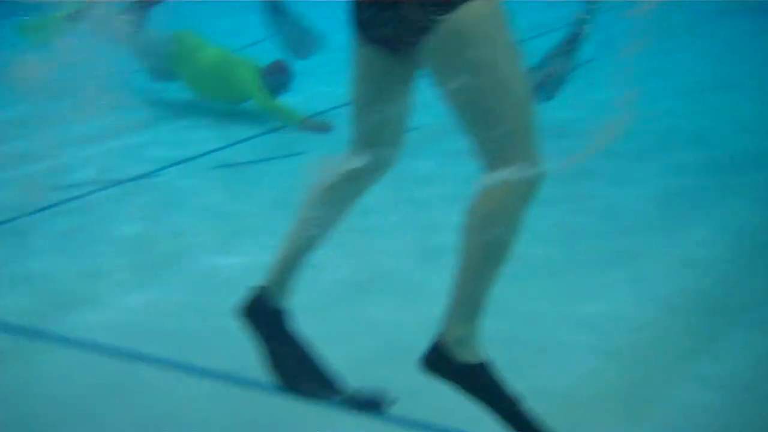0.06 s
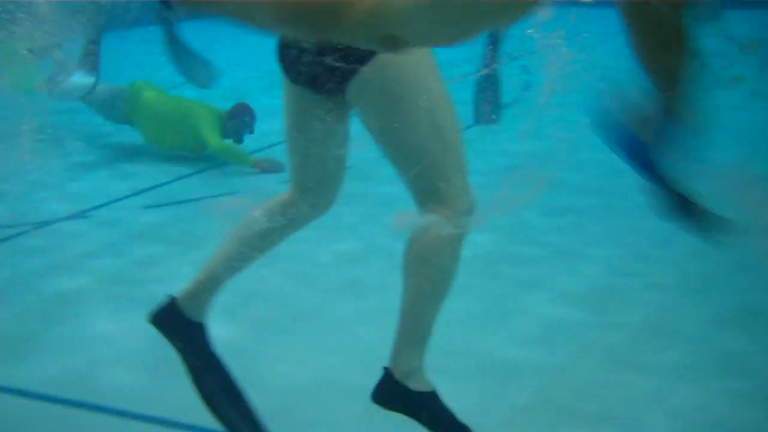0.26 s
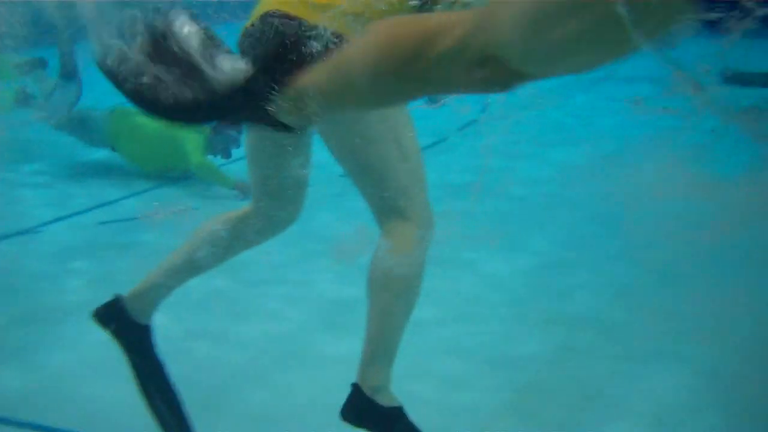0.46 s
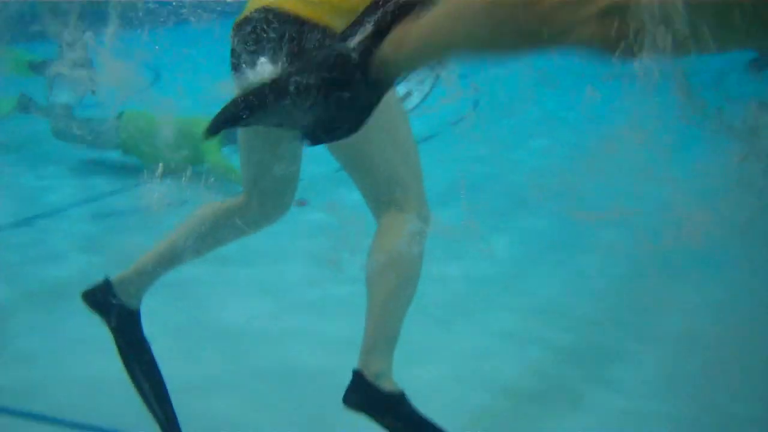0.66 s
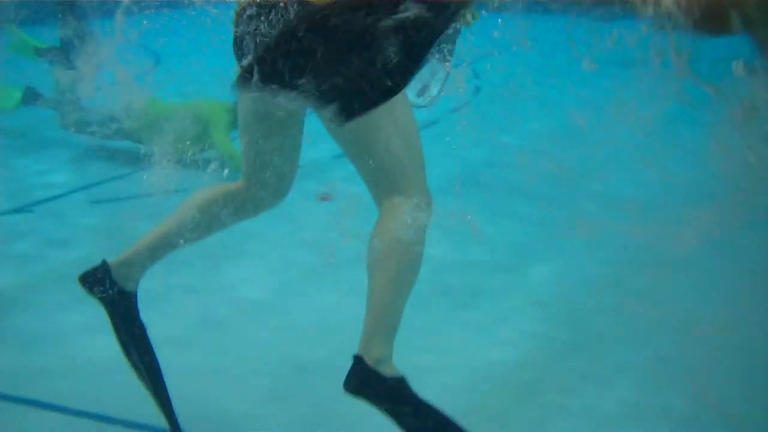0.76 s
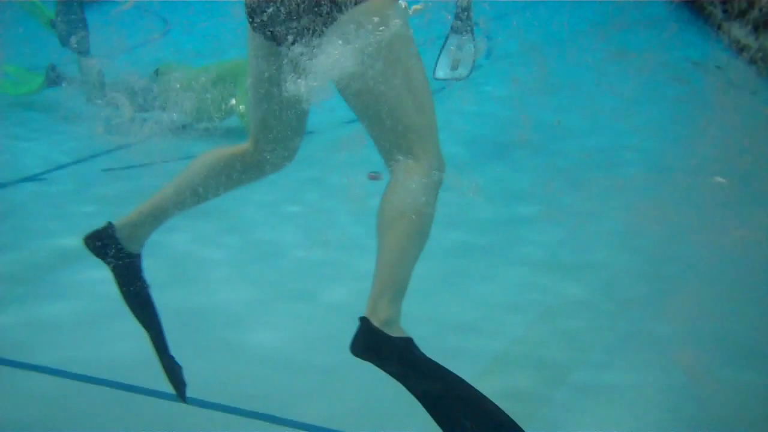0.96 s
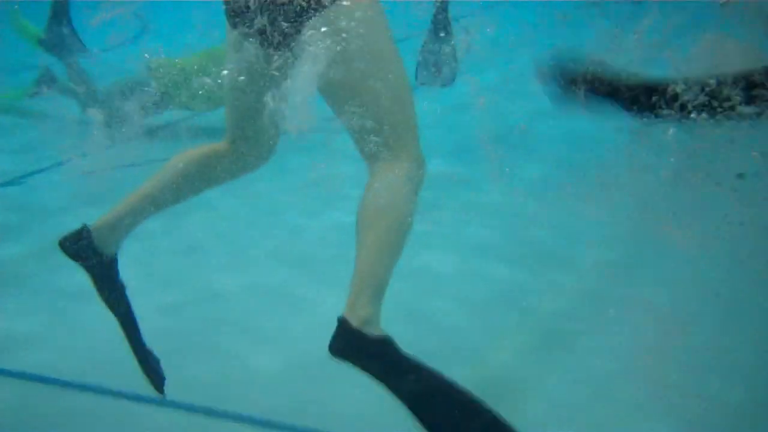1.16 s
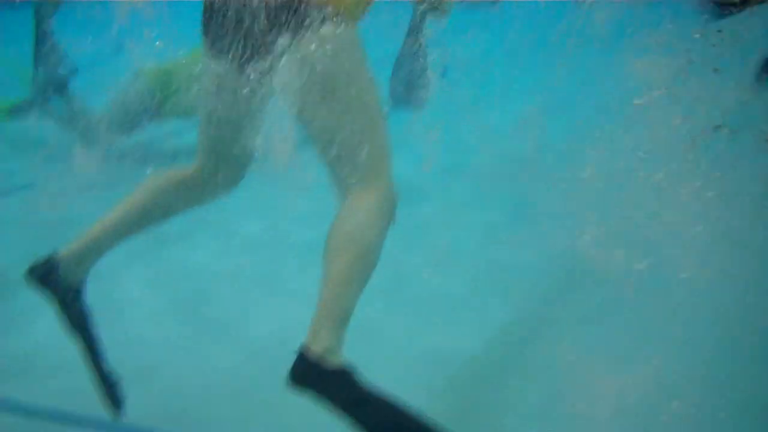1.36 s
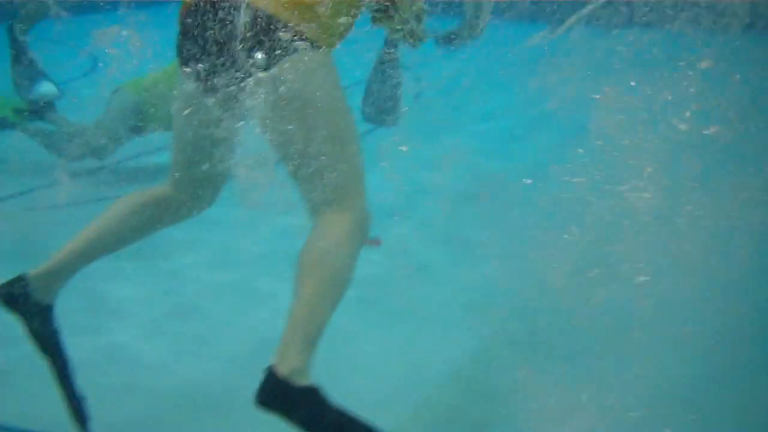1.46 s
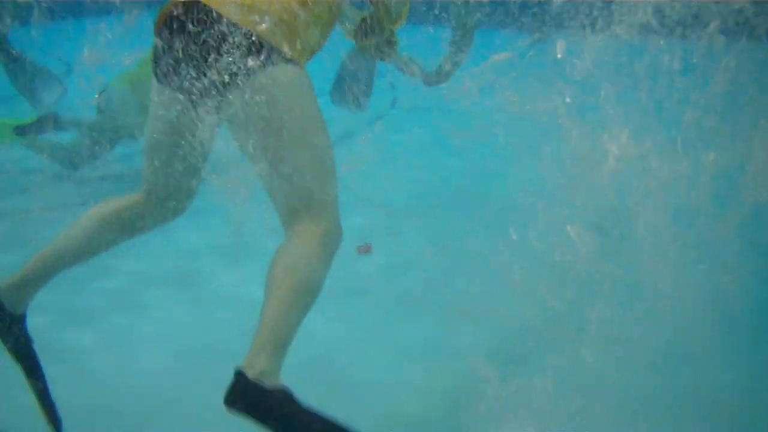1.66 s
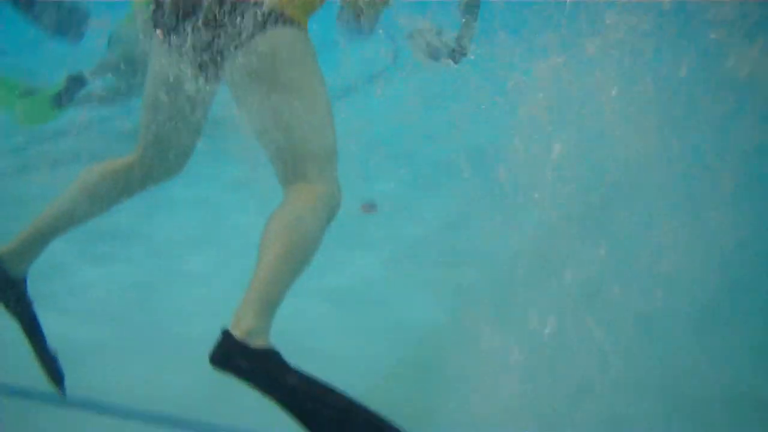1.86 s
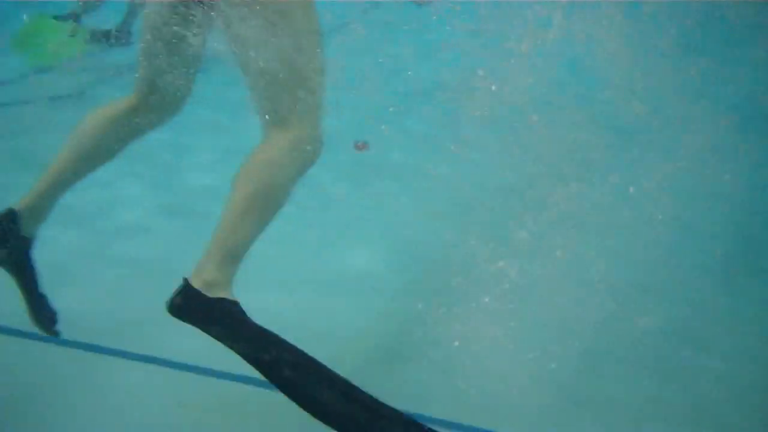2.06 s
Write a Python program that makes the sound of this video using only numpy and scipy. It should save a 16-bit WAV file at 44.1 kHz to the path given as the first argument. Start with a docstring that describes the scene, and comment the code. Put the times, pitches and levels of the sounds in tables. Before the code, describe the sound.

Underwater gurgling in a pool, close and muffled, with crackling bubble fizz and tiny tinkles throughout. At 0.23 seconds a very loud, hollow gulp and thud strike, with more gulps and a booming wake fading until about 0.55. Softer churning follows, with distinct glugs near 1.1, 1.3 and 1.75-1.8. The fizz thins after 1.5, leaving small bright spurts and single bubble pings over low gurgle until 2.1.

```python
"""Air pockets gulp and boom around a watertight housing just under the surface of an indoor pool as swimmers kick past.
Gulps and thuds are swelling, decaying sines near the housing's low resonance; a close kick leaves a muffled
wake of filtered clicks, over steadily gurgling water. Clouds of tiny bubbles fizz as clicks in coloured bands
and resonances of the housing's wall; tinkles are ringing clicks, and a few single bubbles ping as decaying sines."""
import sys
import numpy as np
from scipy import signal
from scipy.io import wavfile

SR = 44100
rng = np.random.default_rng(int(sys.argv[2]) if len(sys.argv) > 2 else 0)


def store_pcm(level_fs):
    """Save levels as 16-bit WAV."""
    pcm = np.round(np.clip(level_fs, -1, 1) * 32767).astype(np.int16)
    wavfile.write(sys.argv[1], SR, np.atleast_2d(pcm).T)


N = 92610
T = np.arange(N) / SR

# Level of the cloud's fine bubbles. Each row: time in seconds, level in dB.
FINE_LEVEL = [(0, -40), (.06, -43.5), (.12, -38.5), (.18, -38.5), (.24, -38), (.29, -44), (.35, -45),
              (.44, -40.5), (.58, -39.5), (.70, -40), (.93, -38), (1.05, -40.5), (1.2, -38), (1.35, -42),
              (1.47, -43.5), (1.55, -44), (1.68, -47.5), (1.85, -46), (1.98, -45), (2.1, -46.5)]
# Place of the cloud by pitch. Each row: frequency in Hz, left-right difference in dB.
CLOUD_PAN = [(500, 1), (1200, -6.5), (1700, -15), (2400, 6.5), (3300, 2), (5000, 2), (7000, -4),
             (9500, 11.5), (14000, -3)]
POPS_PER_S, POP_SPREAD_DB, FIZZ_FLICKER_DB = 1100, 3.5, 2
GURGLES_PER_S, GURGLE_SPREAD_DB, GURGLE_FLICKER_DB = 320, 2.5, 0.5


def from_db(db):
    """Decibels to gain."""
    return 10 ** (np.asarray(db) / 20)


def rms_one(x):
    """Scale to unit power."""
    return x / np.sqrt(np.mean(x ** 2) + 1e-20)


def in_time(rows):
    """A curve at every sample."""
    return np.interp(T, *np.transpose(rows))


def at_hz(points, hz):
    """A spectrum read on a log-frequency axis."""
    point_hz, values = np.transpose(points)
    return np.interp(np.log(hz), np.log(point_hz), values)


def panned(left_right_db):
    """Left and right gains of constant power."""
    return rms_one(from_db([[left_right_db / 2], [-left_right_db / 2]]))


def drift(rate_hz):
    """Slow low-passed noise of unit power, computed at every 40th sample."""
    step = 40
    pole = np.exp(-2 * np.pi * rate_hz * step / SR)
    noise = rng.standard_normal(N // step + 2002)
    slow = signal.lfilter([1], [1, -2 * pole, pole ** 2], noise)[2000:]  # drop the settling
    return np.interp(np.arange(N) / step, np.arange(len(slow)), rms_one(slow))


def pops(rate_per_s, spread_db):
    """Two unrelated trains of bubble clicks of uneven size over the smooth hiss of far ones."""
    far_hiss_db = -1  # relative to the near clicks
    sizes_db = spread_db * np.minimum(rng.exponential(1, (2, N)), 5)
    clicks = from_db(sizes_db) * rng.choice([-1, 1], (2, N))
    near = rms_one(clicks * (rng.random((2, N)) < rate_per_s / SR))
    far = from_db(far_hiss_db) * rng.standard_normal((2, N))
    return rms_one(near + far)


def stereo(pair, hz):
    """Mix two unrelated signals to left and right: alike in the bass, apart in the treble."""
    # Each row: frequency in Hz, left-right correlation.
    likeness = [(100, .98), (250, 0.96), (600, 0.81), (1300, 0.84), (2500, 0.26), (5000, 0.38),
                (8000, -0.14), (14000, -0.29)]
    alike = np.clip(at_hz(likeness, hz), -1, 1)
    return np.sqrt(1 + alike) * pair[0] + np.sqrt(1 - alike) * pair[1] * [[1], [-1]]


def bands(colour, rate_per_s, spread_db, flicker_db):
    """Bubble clicks in third-octave bands, each flickering; yields (Hz, stereo band)."""
    trains = [pops(rate_per_s, spread_db), pops(rate_per_s, spread_db)]
    together = drift(7.9)
    for k, hz in enumerate(31.25 * 2 ** (np.arange(28) / 3)):
        if not colour[0][0] * 0.9 < hz < colour[-1][0] * 1.25:
            continue
        flicker = from_db(flicker_db * (drift(47) + together) / np.sqrt(2))
        sos = signal.butter(2, [hz / 1.12, hz * 1.12], "band", fs=SR, output="sos")
        band = signal.sosfilt(sos, trains[k % 2])  # neighbours use different trains
        yield hz, from_db(at_hz(colour, hz)) * flicker * stereo(band, hz)


def bubbling(colour, rate_per_s, spread_db, flicker_db):
    """All bands of bubble clicks summed to unit power."""
    return rms_one(sum(x for hz, x in bands(colour, rate_per_s, spread_db, flicker_db)))


def resonate(x, hz, width_hz):
    """Two-pole resonance with a peak gain near 1."""
    r = np.exp(-np.pi * width_hz / SR)
    numerator = np.array([1, 0, -1]) * (1 - r * r) / 2
    return signal.lfilter(numerator, [1, -2 * r * np.cos(2 * np.pi * hz / SR), r * r], x)


def boom():
    """Gurgle clicks ringing the housing's low resonance, at unit power."""
    boom_hz, width_hz = 245.3, 21.7
    clicks = pops(GURGLES_PER_S, GURGLE_SPREAD_DB)[0]
    return rms_one(resonate(resonate(clicks, boom_hz, width_hz), boom_hz, boom_hz))


def churn():
    """Stirred water gurgles all the time and keeps the housing booming."""
    # Each row: time in seconds, level in dB.
    level = [(0, -42), (.06, -45.5), (.12, -35.5), (.22, -33), (.6, -38.5), (.72, -39.5), (.85, -38.5),
             (.97, -35), (1.08, -35), (1.25, -38), (1.35, -38), (1.43, -42.5), (1.6, -43), (1.7, -39),
             (1.88, -40.5), (1.98, -41), (2.1, -43.5)]
    # Each row: frequency in Hz, relative level in dB per Hz.
    colour = [(30, -18), (55, -22.5), (90, -12), (130, -2.5), (190, -2), (250, 5), (320, 0.5), (480, -12.5),
              (600, -11.5), (900, -30.5)]
    boom_db = -0.5  # relative to the water
    water = bubbling(colour, GURGLES_PER_S, GURGLE_SPREAD_DB, GURGLE_FLICKER_DB)
    return from_db(in_time(level)) * rms_one(water + from_db(boom_db) * boom())


def fizz():
    """The bubble cloud crackles through the housing's wall and rings its resonances."""
    # Level of the coarser bubbles. Each row: time in seconds, level in dB.
    coarse_level = [(0, -41), (.06, -49.5), (.1, -40), (.18, -47.5), (.24, -39.5), (.32, -41.5),
                    (.45, -38.5), (.55, -42), (.7, -42.5), (.9, -43), (1.05, -42.5), (1.22, -37.5),
                    (1.38, -42), (1.5, -44.5), (1.65, -46.5), (1.85, -46.5), (2.1, -55)]
    # Each row: frequency in Hz, relative level in dB per Hz.
    colour = [(500, -45), (750, 6.5), (1000, -12), (1500, 3.5), (2100, -5), (2800, 5.5), (4000, 0.5),
              (4600, -0.5), (6500, -6.5), (8200, -17), (9500, -19), (13500, -24)]
    # Wall resonances. Each row: frequency in Hz, width in Hz, relative gain in dB, left-right difference in dB.
    wall = [(1236, 91, 10.5, -3), (1730, 130, 9.5, -3), (2477, 62, 6, -7), (2895, 120, 4, 4),
            (3335, 57, 7, 2), (3890, 117, 7, 3), (5190, 110, 0, -10), (7695, 550, -2.5, 7.5)]
    coarse_below_hz = 1900
    parts = []
    for hz, band in bands(colour, POPS_PER_S, POP_SPREAD_DB, FIZZ_FLICKER_DB):
        parts.append((hz, panned(at_hz(CLOUD_PAN, hz)) * band))
    clicks = pops(POPS_PER_S, POP_SPREAD_DB)
    for hz, width_hz, db, pan_db in wall:
        ring = resonate(resonate(clicks, hz, width_hz), hz, hz / 2)
        gain = from_db(db + FIZZ_FLICKER_DB * drift(10))
        parts.append((hz, gain * panned(pan_db) * stereo(ring, hz)))
    fine, coarse = from_db(in_time(FINE_LEVEL)), from_db(in_time(coarse_level))
    levelled = sum(x * (coarse if hz < coarse_below_hz else fine) for hz, x in parts)
    return levelled / np.std(sum(x for hz, x in parts))  # unit power before the level curves


def tinkles():
    """Small bubbles pinch off at random, ringing at one of 36 pitches, each with its own place."""
    # Each row: frequency in Hz, relative level in dB.
    colour = [(700, -0.5), (1700, 0), (3000, -4), (5500, -6.5), (9000, -8.5)]
    pitches, tinkles_per_s, spread_db, ring_cycles = 36, 260, 3, 16.5  # ring_cycles: pitch over width
    mean_db, follows_fizz = -53.5, 0.86  # share of the fizz's level swings, in dB
    out = 0
    for hz in np.geomspace(700, 9000, num=pitches):
        sizes = from_db(spread_db * np.minimum(rng.exponential(1, N), 3))
        born = rng.random(N) < tinkles_per_s / pitches / SR
        clicks = sizes * born + 1e-18
        width_hz = hz / ring_cycles
        ring = resonate(resonate(clicks, hz, width_hz), hz, 2 * width_hz) / np.sqrt(hz)
        place = panned(at_hz(CLOUD_PAN, hz) + 2 * rng.standard_normal())
        out = out + place * from_db(at_hz(colour, hz)) * ring
    level_db = in_time(FINE_LEVEL)
    return from_db(mean_db + follows_fizz * (level_db - level_db.mean())) * rms_one(out)


def rumble():
    """Faint deep rumble: noise through a broad low resonance."""
    level_db, hz, width_hz = -68, 35, 40
    return from_db(level_db) * rms_one(resonate(rng.standard_normal((2, N)), hz, width_hz))


def wake():
    """A kick drags air past the housing: a muffled gurgle that starts at once, fades and stops."""
    # Each row: frequency in Hz, relative level in dB per Hz.
    colour = [(40, -35), (100, -13), (170, -7.5), (250, 7), (330, -5), (450, -1.5), (570, -17),
              (720, -21.5), (900, -29)]
    start_s, end_s, attack_s, release_s = 0.228, 0.532, 0.011, 0.033
    start_db, fade_db_per_s, edge_hz = -22.5, 23.5, 790
    ring_hz, ring_width_hz, ring_db, boom_db = 709, 57, -15.5, -5  # dB relative to the gurgle
    water = bubbling(colour, GURGLES_PER_S, GURGLE_SPREAD_DB, GURGLE_FLICKER_DB)
    ring = rms_one(resonate(rng.standard_normal(N), ring_hz, ring_width_hz))
    water = water + from_db(ring_db) * ring + from_db(boom_db) * boom()
    muffled = signal.sosfilt(signal.butter(12, edge_hz, fs=SR, output="sos"), water)
    attack = np.clip((T - start_s) / attack_s, 0, 1)
    release = np.exp(-np.maximum(T - end_s, 0) / release_s)
    return attack * release * from_db(start_db - fade_db_per_s * (T - start_s)) * muffled


def air_body(start_s, peak_db, hz, swell_s):
    """A body of air that swells into ringing and dies, its pitch rising slightly."""
    steepness, rise_per_s = 2.07, 0.18  # rise: share of the pitch
    age = np.maximum(T - start_s, 0)
    envelope = (age / swell_s * np.exp(1 - age / swell_s)) ** steepness
    return from_db(peak_db) * envelope * np.sin(2 * np.pi * hz * age * (1 + rise_per_s * age / 2))


def gulps():
    """Large air pockets and dull shoves of water against the housing, the same in both channels."""
    # Air pockets. Each row: start in seconds, peak in dB, pitch in Hz, swell time in seconds.
    pockets = [(.230, -3, 237.8, 0.011), (0.282, -7, 247, .014), (.342, -19, 250, 0.011),
               (0.375, -12, 238.2, 0.012), (0.426, -15.5, 242, 0.0062), (0.471, -20.5, 245.4, 0.0094),
               (0.531, -30, 270, 0.02), (.618, -29, 233, 0.0021), (0.862, -23.5, 233, 0.015),
               (1.004, -28, 223, 0.0113), (1.063, -30, 240.3, 0.023), (1.110, -20.5, 420, 0.0038),
               (1.115, -16, 247, 0.006), (1.171, -27.5, 258, .008), (1.216, -27.5, 255, 0.0053),
               (1.31, -19, 246, 0.0059), (1.749, -18, 238, 0.0046), (1.805, -18.5, 158.4, 0.014),
               (2.087, -30.5, 220, 0.0045)]
    # Shoves of water. Each row: start in seconds, peak in dB, pitch in Hz.
    thuds = [(0.232, -12.5, 150), (0.313, -27.5, 130), (1.179, -37, 145), (1.214, -33, 137),
             (1.31, -32, 132), (1.99, -37.5, 135)]
    thud_swell_s = 0.0056
    return sum(air_body(*row) for row in pockets) + sum(air_body(*row, thud_swell_s) for row in thuds)


def bursts(rows, colour):
    """Short bell-shaped swells of bubbling of one colour."""
    water = bubbling(colour, POPS_PER_S, POP_SPREAD_DB, FIZZ_FLICKER_DB)
    return water * sum(from_db(db) * np.exp(-((T - peak_s) / spread_s) ** 2 / 2)
                       for peak_s, db, spread_s in rows)


def slaps():
    """Water slaps with the sharper gulps: brief low-coloured bursts of clicks."""
    # Each row: peak time in seconds, level in dB, spread in seconds.
    rows = [(.318, -25, 0.0081), (1.122, -35.5, .009), (1.315, -39, 0.0053), (1.389, -40, 0.0045),
            (1.753, -35, 0.0023)]
    # Each row: frequency in Hz, relative level in dB per Hz.
    colour = [(50, -4), (120, 2), (250, -2), (480, -7), (650, -24), (900, -22)]
    return bursts(rows, colour)


def sprays():
    """Fine bubbles brush the housing: brief bright bursts of clicks."""
    # Each row: peak time in seconds, level in dB, spread in seconds.
    rows = [(.45, -50, 0.032), (1.19, -51, .05), (1.543, -43, 0.011), (1.785, -49, 0.0086)]
    # Each row: frequency in Hz, relative level in dB per Hz.
    colour = [(2500, -13), (3500, 9), (5500, -4), (8500, 4), (11000, -19), (13500, -13)]
    return bursts(rows, colour)


def pings():
    """Small bubbles pinch off right beside the housing and ring out, rising in pitch."""
    # Each row: start in seconds, peak in dB, pitch in Hz, left-right difference in dB.
    rows = [(1.112, -28, 1697, -3), (1.516, -35, 2810, -8), (1.531, -33.5, 5520, -11),
            (1.566, -38.5, 1220, -1), (1.637, -38.5, 1700, -1), (1.6809, -37.5, 1090, -5),
            (1.716, -32.5, 2730, 10), (1.72, -40, 760, 4), (1.769, -33, 1714, -5), (1.841, -37.5, 1730, -4),
            (1.8788, -35, 7700, 8), (1.9225, -43, 1730, -6), (1.957, -42.5, 583, -2),
            (2.0437, -35, 2830, 8)]
    swell_s, ring_at_2khz_s, size_law, rise_per_s = 0.00077, 0.0041, 0.5, 2.1  # rise: share of the pitch
    out = 0
    for start_s, db, hz, pan_db in rows:
        age = np.maximum(T - start_s, 0)
        ring_s = ring_at_2khz_s * (2000 / hz) ** size_law  # bigger bubbles ring longer
        envelope = (1 - np.exp(-(age / swell_s) ** 2)) * np.exp(-age / ring_s)
        envelope = envelope / envelope.max()
        tone = np.sin(2 * np.pi * hz * age * (1 + rise_per_s * age / 2))
        out = out + panned(pan_db) * from_db(db) * envelope * tone
    return out


def scene():
    """Everything that reaches the housing; the deepest bass of the lower sounds is cut away."""
    low_cut_hz = 51
    low = churn() + wake() + gulps() + slaps()
    low = signal.sosfilt(signal.butter(2, low_cut_hz, "high", fs=SR, output="sos"), low)
    return low + fizz() + tinkles() + rumble() + sprays() + pings()


def record(dry):
    """Peaks beyond full scale clip, then a steep low-pass cuts the top."""
    stop_hz, stop_db = 14850, 70
    low_pass = signal.cheby2(16, stop_db, stop_hz, fs=SR, output="sos")
    return signal.sosfilt(low_pass, np.clip(dry, -1, 1))


dry = scene()
out = record(dry)
store_pcm(out)
```